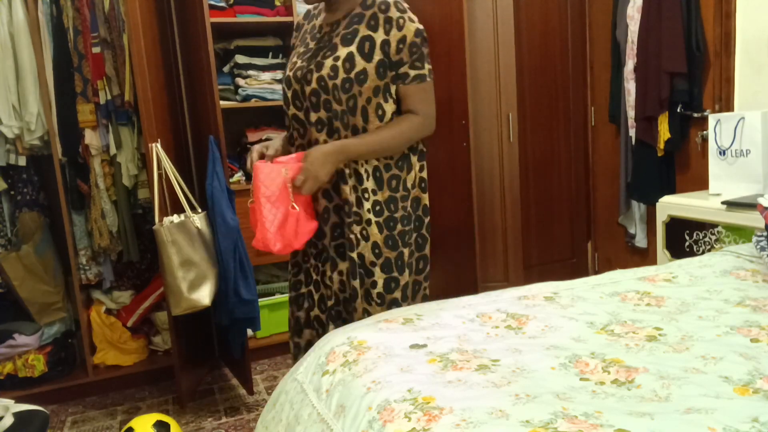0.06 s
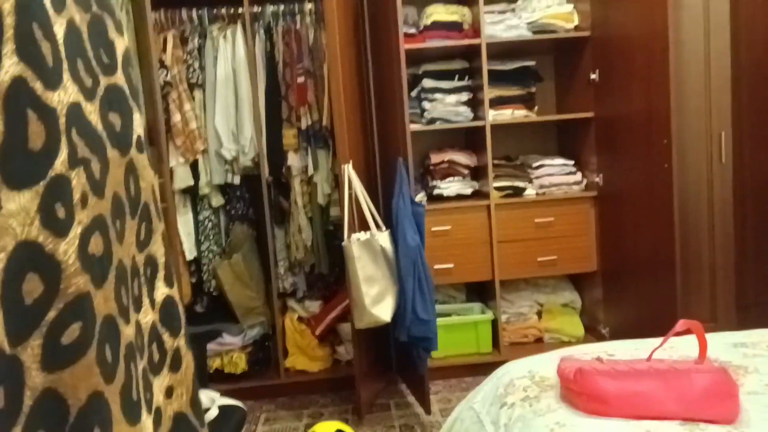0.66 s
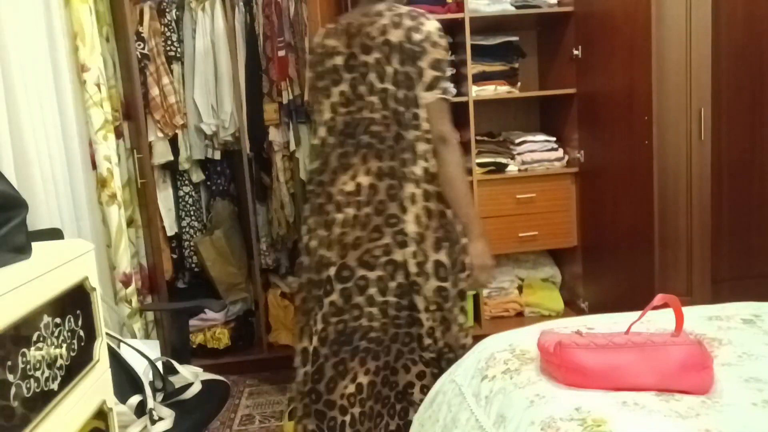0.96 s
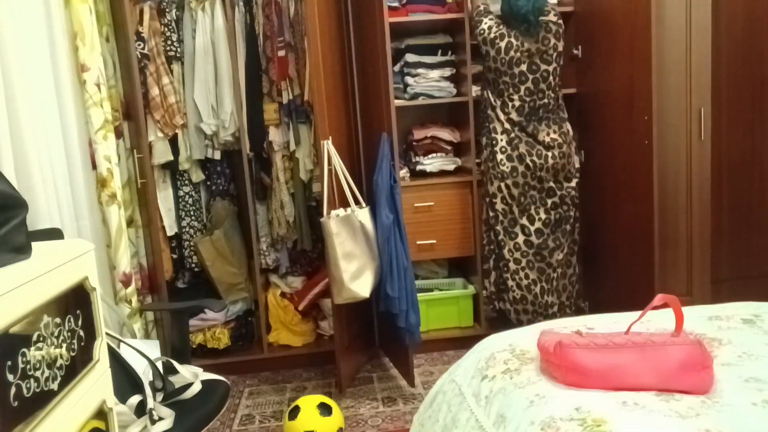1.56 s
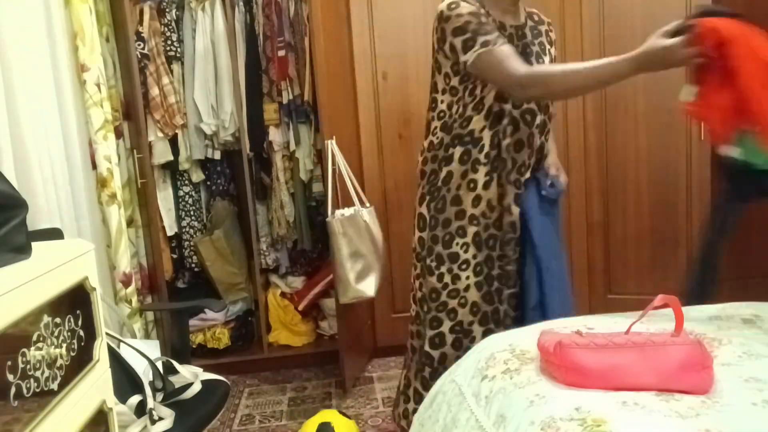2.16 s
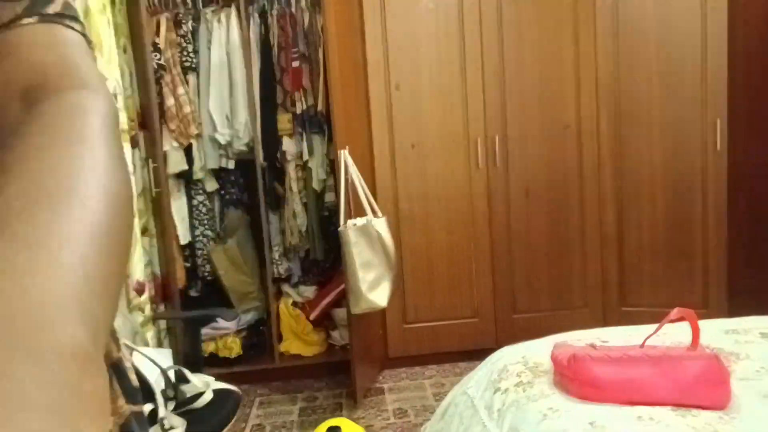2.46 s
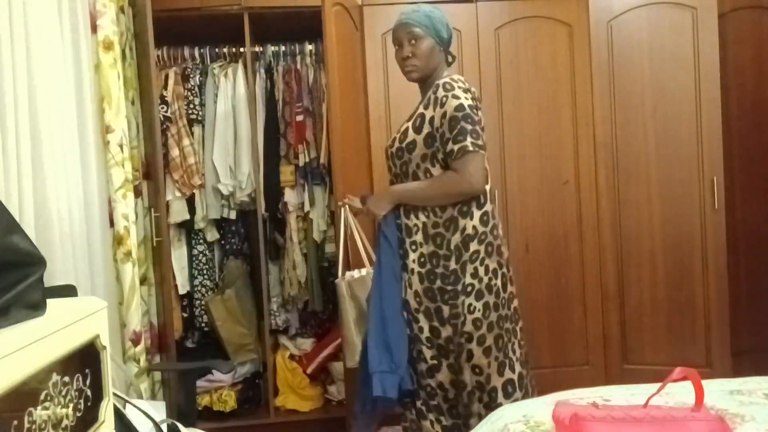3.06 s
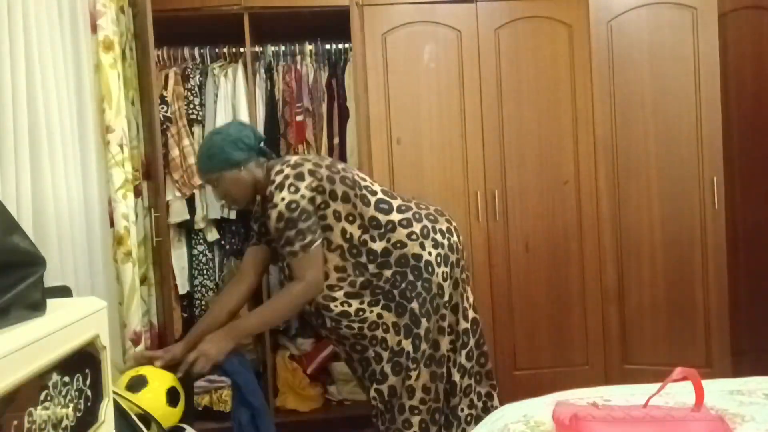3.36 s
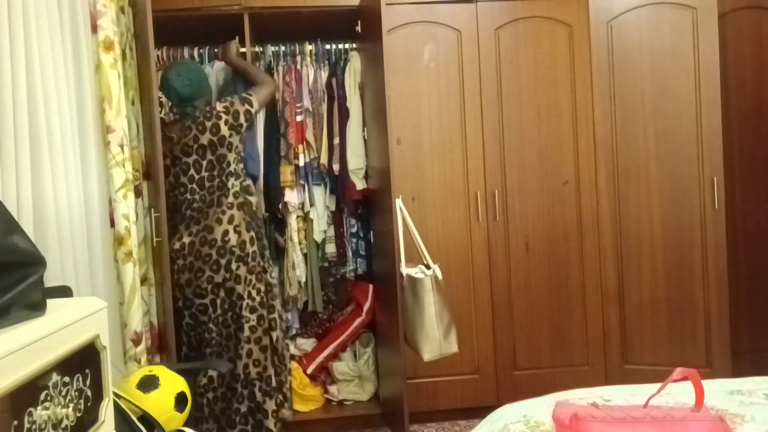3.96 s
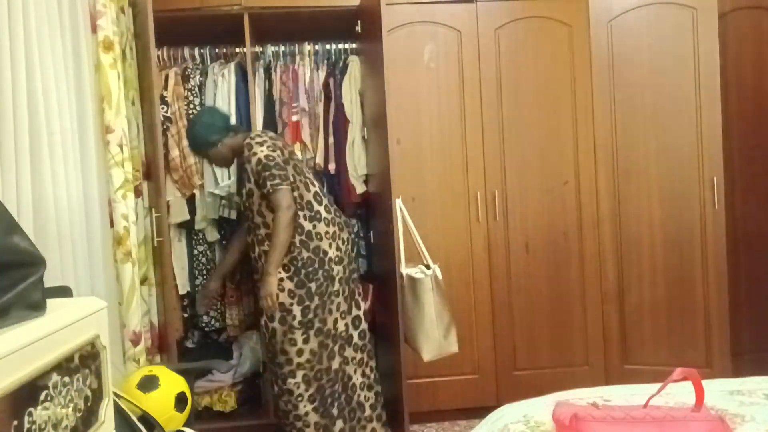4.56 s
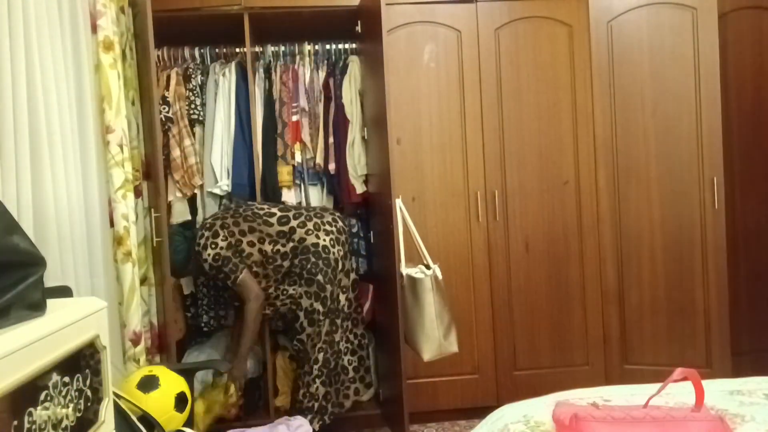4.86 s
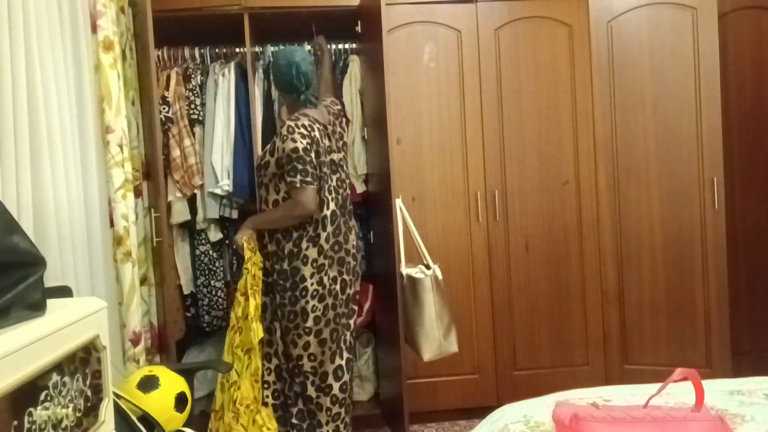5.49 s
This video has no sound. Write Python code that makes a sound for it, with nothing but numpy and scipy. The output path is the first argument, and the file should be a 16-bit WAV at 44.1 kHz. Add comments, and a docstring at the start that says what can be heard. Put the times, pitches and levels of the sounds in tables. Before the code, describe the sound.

Someone tidies clothes in a wooden wardrobe, every sound cut short as if sped up. Fabric swishes and crinkles, a few knocks come early, then soft footsteps thud. A cluster of sharp door knocks follows on the left. Later comes the loudest knock, a brisk rustle and finally ringing hanger clacks. A phone microphone picks it up over the bedroom's faint rumble and hiss.

```python
"""Bedroom, wooden wardrobe: someone tidies clothes, in fast motion, so each sound is cut short.
Cloth swishes and crinkles as fibres catch and slip. Hangers clack on the rail, doors and shelves knock,
feet thud: each a crack and rattle through the wardrobe's resonances, plus the struck part's own modes.
A hook squeaks twice. A phone with two microphone ports hears it over low rumble and faint hiss."""
import sys
import numpy as np
from scipy import signal
from scipy.fft import rfft, irfft
from scipy.io import wavfile
from scipy.ndimage import uniform_filter1d

SR = 44100
rng = np.random.default_rng(int(sys.argv[2]) if len(sys.argv) > 2 else 0)


def store_pcm(level_fs):
    """Save levels as 16-bit WAV."""
    pcm = np.round(np.clip(level_fs, -1, 1) * 32767).astype(np.int16)
    wavfile.write(sys.argv[1], SR, np.atleast_2d(pcm).T)


N = 252693
SIZE, LEAD = 4608, 1764  # samples per event, samples before its peak
MS = (np.arange(SIZE) - LEAD) / SR * 1000
HZ = np.maximum(np.arange(SIZE // 2 + 1) * SR / SIZE, 1)
SCENE_HZ = np.maximum(np.arange(N // 2 + 1) * SR / N, 1)
WOOD_WEIGHT_HZ, LIGHT_WEIGHT_HZ, BRIGHT_HZ = 400, 1010, 3130  # corners: two bass shelves, treble tilt
SHAKEN_RING_HZ, SHAKEN_RING_DB = 2449, -3  # hangers shaken by a knock or thud

# wardrobe and hanger resonances: f/Hz, width/Hz, gain/dB
WARDROBE_MODES = [(141.2, 50, -24.5), (382, 10, -9.5), (577, 56, -8), (785, 37, -6), (937, 9.2, 1),
                  (1102, 22, -36.5), (1103, 14, -29.5), (1625, 240, -4), (2210, 11, -7.5),
                  (2435, 560, -3.5), (2680, 19, -3), (3111, 92, -1.5), (3790, 31, 0.5), (6683, 900, -5)]
# microphone port response, a treble dip and a resonance above it: f/Hz, gain/dB
PORT_RESPONSE = [(7000, 0), (8500, -1), (11500, -3), (13500, -3), (14400, 5), (15200, 12), (15700, 12),
                 (16300, 2)]
# edges of a blow's bands (thump, wood, clack, edge, air): f/Hz
BLOW_EDGES_HZ = [70, 380, 1300, 3800, 8500, 16500]


def amp(db):
    return 10 ** (np.asarray(db) / 20)


def unit(x):
    return x / np.sqrt(np.mean(x ** 2))


def sides(pan_db):
    """Constant-power gains; pan is left minus right."""
    return unit(amp(np.array([[pan_db], [-pan_db]]) / 2))


def curve(points, hz):
    """Gain at hz of a spectrum listed as f/Hz, level/dB."""
    f, db = np.transpose(points)
    return amp(np.interp(np.log(hz), np.log(f), db))


def colour(x, gain):
    """Minimum-phase filter for one event."""
    cepstrum = irfft(np.log(gain + 1e-9))
    cepstrum[1:SIZE // 2] *= 2
    cepstrum[SIZE // 2 + 1:] = 0
    return irfft(rfft(x) * np.exp(rfft(cepstrum)))


def band_centres(edges_hz):
    edges_hz = np.array(edges_hz)
    return np.sqrt(edges_hz[:-1] * edges_hz[1:])


def band_levels(edges_hz, tone_db, weight_db, weight_hz, bright_db):
    """Base tone plus a bass shelf (weight) and a treble tilt (brightness, per half decade)."""
    hz = band_centres(edges_hz)
    bass = 1 / (1 + (hz / weight_hz) ** 4)
    treble = np.log10(np.hypot(1, (hz / BRIGHT_HZ) ** 2))
    return np.array(tone_db) + weight_db * bass + bright_db * treble


def equalise(x, edges_hz, bands_db, duration_samples):
    """Filter smoothly towards the band levels, taken over the duration."""
    for _ in range(2):
        spectrum = np.mean(np.abs(rfft(x)) ** 2, axis=0) * 2 / SIZE
        energy = np.array([spectrum[(HZ >= lo) & (HZ < hi)].sum()
                           for lo, hi in zip(edges_hz, edges_hz[1:])])
        gain_db = bands_db - 10 * np.log10(energy / duration_samples)
        x = colour(x, curve(np.c_[band_centres(edges_hz), gain_db], HZ))
    return x


def swell(rise_ms, decay_ms, onset_spans):
    """Exponential rise and decay, starting onset_spans rise times before the peak."""
    shape = np.exp(np.where(MS < 0, MS / rise_ms, -MS / decay_ms))
    return shape * np.clip(MS / rise_ms + onset_spans, 0, 1)


def snatch(length_ms, fade_ms):
    """Fast motion cuts a sound short."""
    return .5 - .5 * np.tanh((MS - length_ms) / fade_ms)


def add(out, t_s, event):
    start = int(t_s * SR) - LEAD
    lo, hi = max(start, 0), min(start + SIZE, N)
    out[:, lo:hi] += event[:, lo - start:hi - start]


def drift(rate_hz):
    """Smooth random curve, rms 1."""
    hold = int(SR / rate_hz)
    steps = np.repeat(rng.standard_normal(N // hold + 1), hold)
    return unit(uniform_filter1d(uniform_filter1d(steps, hold), hold)[:N])


def port_noise(samples, hz, apart_hz, treble_coherence):
    """Noise field at the two ports: alike in the bass, mostly different above apart_hz."""
    coherence = treble_coherence + (.93 - treble_coherence) / (1 + (hz / apart_hz) ** 2)
    mid, side = rfft(rng.standard_normal((2, samples))) * np.sqrt([1 + coherence, 1 - coherence])
    return irfft(np.array([mid + side, mid - side]), samples) / np.sqrt(2)


def room():
    """Wavering rumble under a steady hiss."""
    # room noise: f/Hz, density/dB
    spectrum = [(25, -9), (70, -1.5), (200, -4), (300, -10.5), (380, -8.5), (520, -17.5), (800, -22.5),
                (1200, -23.5), (2500, -29.5), (4500, -39), (6500, -43.5), (8500, -54.5), (12000, -48.5),
                (16000, -57)]
    noise = port_noise(N, SCENE_HZ, apart_hz=490, treble_coherence=.06)
    air = unit(irfft(rfft(noise) * curve(spectrum, SCENE_HZ) * curve(PORT_RESPONSE, SCENE_HZ), N))
    rumble = irfft(rfft(air) / (1 + (SCENE_HZ / 450) ** 4), N)
    waver_db = 2.1 * drift(rate_hz=35)
    return amp(-60) * (rumble * amp(waver_db) + air - rumble)


def mic_hiss():
    """Microphone self-noise, lifted by the port resonance."""
    return amp(-88) * irfft(rfft(rng.standard_normal((2, N))) * curve(PORT_RESPONSE, SCENE_HZ), N)


def briskness_db(t_s):
    """Friction level: higher when the garments move briskly."""
    # garment friction: t/s, level/dB
    friction = [(0.0, -66), (0.27, -78), (0.99, -80), (1.42, -74), (2.15, -81), (2.55, -72.5), (2.68, -80),
                (3.5, -76.5), (3.8, -79.5), (4.39, -75), (4.58, -73), (4.76, -59), (4.88, -67.5),
                (5.11, -80), (5.3, -85), (5.73, -84)]
    return np.interp(t_s, *np.transpose(friction))


def brush():
    """Faint, fluttering friction of moving garments."""
    # cloth friction: f/Hz, density/dB
    spectrum = [(300, -8.5), (1000, 5), (2500, 13), (4200, 2.5), (6500, 0.5), (8500, -13.5), (12000, -17.5),
                (16000, -20.5)]
    white = rng.standard_normal((2, N))
    rub = irfft(rfft(white) * curve(spectrum, SCENE_HZ) * curve(PORT_RESPONSE, SCENE_HZ), N)
    flutter_db = 3.8 * drift(rate_hz=70)
    return unit(rub) * amp(briskness_db(np.arange(N) / SR) - 1.5 + flutter_db)


def grains(spread_db):
    """Dense run of tiny contacts."""
    sizes = amp(spread_db * np.repeat(rng.standard_normal(SIZE // 16), 16))
    return unit(port_noise(SIZE, HZ, apart_hz=520, treble_coherence=-.05) * sizes)


def wardrobe(x):
    """Nearby panels send each port four echoes; wardrobe and hangers resonate."""
    lags_s = rng.uniform(.3, 3, (2, 4, 1)) / 1000
    echoes = .21 * np.sum(np.exp(-2j * np.pi * HZ * lags_s), axis=1)
    resonances = sum(amp(db) / (1 + 1j * (HZ ** 2 - hz ** 2) / (HZ * width_hz))
                     for hz, width_hz, db in WARDROBE_MODES)
    return irfft(rfft(x) * (1 + echoes) * (1 + resonances))


def mode(hz, db, width_hz):
    """One vibration, db over unit noise within width_hz; rattling blurs its pitch."""
    phase = rng.uniform(0, 2 * np.pi)
    port_shift = np.array([[1], [-1]]) * rng.uniform(-1, 1) * min(hz / 800, np.pi / 2)
    blur = np.cumsum(rng.standard_normal(SIZE)) * np.sqrt(hz * .33 / SR)
    gain = amp(db) * np.sqrt(4 * width_hz / SR)
    return gain * np.sin(2 * np.pi * hz * MS / 1000 + phase + port_shift + blur)


def grain_burst(db, rise_ms, decay_ms, weight_db, bright_db):
    """Short swell of tiny contacts (slipping fibres or a dying rattle); a hanger rings faintly."""
    # band edges (body, rub, hiss, air): f/Hz
    edges_hz = [70, 1300, 3800, 8500, 16500]
    # base tone per band: level/dB
    tone_db = [1, 0.5, -2, -9]
    shape = swell(rise_ms, decay_ms, onset_spans=2.16) * snatch(9.5 + .51 * decay_ms, fade_ms=6.4)
    ring_hz = 3160 * 2 ** (.27 * rng.uniform(-1, 1))
    ring_db = 5 - .3 * (db + 52)  # a firmer hand damps the hanger
    burst = wardrobe(grains(spread_db=0)) + mode(ring_hz, ring_db, width_hz=730)
    burst = colour(burst, curve(PORT_RESPONSE, HZ) / (1 + (110 / HZ) ** 4)) * shape
    bands_db = db + band_levels(edges_hz, tone_db, weight_db, LIGHT_WEIGHT_HZ, bright_db)
    return equalise(burst, edges_hz, bands_db, np.sum(shape ** 2))


def crinkles(per_s=7, spread_db=9.5):
    """Small folds give way at random, louder when the garments move briskly."""
    out = np.zeros((2, N))
    for slot in range(int(per_s * N / SR)):
        t_s = (slot + rng.uniform()) / per_s
        size_db, bright_db = spread_db * rng.uniform(-1, 1, 2)
        db = briskness_db(t_s) + 1 + size_db
        fold = grain_burst(db, rise_ms=5, decay_ms=9, weight_db=-2.5, bright_db=bright_db - 2)
        add(out, t_s, fold * sides(pan_db=-9))
    return out


def swishes_and_rattle():
    """Cloth swishes, and at 4.53 s the dull dying rattle of the loudest knock."""
    # swishes and the one rattle: t/s, level/dB, rise/ms, decay/ms, weight/dB, brightness/dB, pan/dB
    bursts = [(0.124, -52.5, 2.3, 19, -3, 8, -0.5), (0.203, -51, 11.6, 11.7, -2, 10, -0.5),
              (0.277, -71, 7.8, 8, -10, 10, -3), (0.354, -70, 3.9, 7, -15, 14, 1),
              (0.509, -68.5, 3.2, 40, -1, 5, -4), (0.579, -41, 2.1, 2.5, 1, -9, -13),
              (0.69, -54.5, 13, 9.5, 2.5, -3, -3), (0.839, -71.5, 5.4, 13, -12, 22.5, -2),
              (1.03, -63, 3, 9, 0.5, -18, -2), (1.18, -57, 14, 5.4, -28, -16, -2),
              (1.228, -55, 10, 6, -21, -16, -1), (1.26, -71.5, 15, 38, 9, 6, -2),
              (1.37, -63.5, 8, 9.2, 3, -4, -5), (1.438, -63.5, 6.7, 10, 14.5, -10, -5.5),
              (1.477, -55, 5.7, 6.5, 0.5, -13, 1), (1.65, -54, 7, 5, -6, -43, 0),
              (1.742, -65.5, 17, 9, -3, -5, -3), (1.815, -83, 6.7, 5.3, 0, 25.5, -3),
              (1.851, -59.5, 4.8, 21, -5, -38, -1), (1.953, -59, 9.4, 14, -6, -25, -4),
              (2.063, -61.5, 10, 18, -3, -16.5, -2), (2.435, -47, 3.5, 17, -12, -4, -12),
              (2.56, -50.5, 9.2, 11, 1, -7, 3), (2.869, -59, 8.3, 11, -22, 0, -8),
              (3.286, -48.5, 4.8, 4.8, 0, -5, -3), (3.581, -55.5, 19, 12.5, -3, -13, -3),
              (4.035, -55, 14, 20, -18, -6, -1), (4.091, -66, 11, 10, 8.5, -4.5, -1.5),
              (4.361, -49.5, 8.1, 24, 7.5, -5, -0.5), (4.48, -50.5, 8.2, 11, 8, 0, 3),
              (4.526, -36.5, 5, 8.7, 4.5, -23.5, -1.5), (4.598, -59, 14, 11, 9, -11, -4),
              (4.699, -66, 8.3, 17, 6, 21.5, 0), (4.793, -51, 21, 7.8, -19, -23, -2),
              (4.849, -58.5, 14, 10, 11, -4, 0), (4.881, -39.5, 10.9, 6.8, -5, -6, -9),
              (4.903, -40.5, 11.6, 15.3, 3.5, 5, -1.5), (4.941, -32, 8.8, 16.7, -4, 1.5, -1),
              (5.007, -50.5, 7.5, 15, -2.5, -13, -1), (5.039, -59, 15.5, 10, -9, 13, -8.5),
              (5.149, -64.5, 9.5, 29, -1, 2, -0.5), (5.307, -60.5, 5.9, 7.3, -15, -0.5, -2.5),
              (5.53, -59.5, 9.8, 13, -24, 14, -2)]
    out = np.zeros((2, N))
    for t_s, db, rise_ms, decay_ms, weight_db, bright_db, pan_db in bursts:
        add(out, t_s, grain_burst(db, rise_ms, decay_ms, weight_db, bright_db) * sides(pan_db))
    return out


def hanger_ring(hz, db):
    """A hanger's unequal arms split its ring into three close modes."""
    return sum(mode(hz * ratio, db + offset_db, width_hz=1400)
               for ratio, offset_db in [(.86, -1.5), (1, -1.5), (1.14, -4.5)])


def strike(bands_db, rise_ms, decay_ms, pan_db, thump_hz, hollow_hz, hollow_db,
           ring_hz=SHAKEN_RING_HZ, ring_db=SHAKEN_RING_DB):
    """A crack and a dying rattle ring the wardrobe; the struck part and hangers add their modes."""
    shape = swell(rise_ms, decay_ms, onset_spans=24)
    cut = snatch(12 + .85 * decay_ms, fade_ms=2)
    duration_samples = np.sum((shape * cut) ** 2)
    crack_share = .3 * np.exp(-rise_ms / 1.8)  # of the energy; larger for a sudden contact
    contact = grains(spread_db=3) * shape * np.sqrt(1 - crack_share)
    contact[:, LEAD] += np.sqrt(crack_share * duration_samples)
    rattle = wardrobe(contact)
    body = mode(thump_hz, db=7.5, width_hz=89) + mode(hollow_hz, hollow_db, width_hz=370)
    blow = rattle + shape * (body + hanger_ring(ring_hz, ring_db))
    blow = colour(blow, curve(PORT_RESPONSE, HZ) / (1 + (100 / HZ) ** 6)) * cut
    blow = equalise(blow, BLOW_EDGES_HZ, bands_db, duration_samples)
    bass = 1 / (1 + (HZ / 400) ** 4)  # the thump leans further to its side than the clack
    return irfft(rfft(blow) * (bass * sides(1.8 * pan_db) + (1 - bass) * sides(pan_db)))


def clacks():
    """Hangers hit the one rail, each ringing at its own pitch."""
    # hanger hits: t/s, level/dB, rise/ms, decay/ms, weight/dB, brightness/dB, ring/Hz, ring/dB, pan/dB
    hits = [(0.547, -39, 1.1, 4, -1.5, 3.5, 2250, -4, -3.5),
            (2.71, -25, 0.28, 1.16, -38, -15, 2505, 15.5, -20),
            (3.61, -37.5, 3.1, 4.3, -6, -0.5, 1743, 5.5, 0.5),
            (3.9893, -39.5, 1.6, 10, 2.5, 5, 2950, 10, -1), (4.01, -44.5, 6.9, 6.6, -7, 6, 2810, -2, -3),
            (4.385, -37, 3.9, 26, 3, -3.5, 2200, -3, -0.5), (5.5, -28, 2.34, 8, -4.5, 1.5, 2824, 12, -0.5),
            (5.5079, -27, 1, 6.2, -8, -5, 2707, 13.5, 0), (5.562, -39.5, 1.1, 4, 5, -12, 2650, 13, -3.5),
            (5.569, -33, 2.9, 8.2, 3.5, -10.5, 2698, 16.5, -3)]
    # clack tone per band: level/dB
    tone_db = [-11.5, -6.5, 0.5, -4.5, -14]
    out = np.zeros((2, N))
    for t_s, db, rise_ms, decay_ms, weight_db, bright_db, ring_hz, ring_db, pan_db in hits:
        bands_db = db + band_levels(BLOW_EDGES_HZ, tone_db, weight_db, LIGHT_WEIGHT_HZ, bright_db)
        add(out, t_s, strike(bands_db, rise_ms, decay_ms, pan_db, thump_hz=342,
                             hollow_hz=808, hollow_db=-5.5, ring_hz=ring_hz, ring_db=ring_db))
    return out


def knocks():
    """Each door or shelf has its own thump and hollow note, and shakes the hangers."""
    # wood hits: t/s, level/dB, rise/ms, decay/ms, weight/dB, brightness/dB,
    # thump/Hz, hollow/Hz, hollow/dB, pan/dB
    hits = [(0.5857, -32.5, 3.1, 4.7, -1, 0, 395, 501, 22, -0.5),
            (0.6069, -43, 1.1, 9, 8.5, 12, 181, 603, -7, -10),
            (0.6247, -39.5, 2.0, 9.3, 4, 11, 234, 642, 11, -3),
            (0.7088, -37, .4, 6.8, -11, 3.5, 160, 626, 21, -7),
            (2.379, -36.5, 2.6, 4.8, -8, 1, 386, 672, 15, -9.5),
            (2.3902, -38.5, 4.8, 5.3, -5, 1.5, 390, 740, 2, -1),
            (2.453, -35, 2.5, 3.7, 3.5, -1, 153, 565, 2.5, -8),
            (2.466, -33.5, 1.8, 4.4, 4.5, 2.5, 308, 560, 8.5, -9),
            (2.487, -45.5, 10, 6.4, 9.5, 10.5, 95, 1200, 5, -1),
            (2.524, -24, .8, 8.5, 1, 6, 242, 595, 7, -8.5),
            (2.5733, -27, .9, 5.1, -3.5, -3.5, 223, 928, 2.5, -12),
            (2.5923, -25.5, 0.34, 12.1, -1.5, 5, 216, 641, 4, -7.5),
            (3.293, -32.5, 1.9, 9.5, 5.5, -22, 232, 431, 4, -1),
            (3.335, -37.5, 4.1, 17, -3, -1, 234, 501, -1, -2),
            (4.434, -33, 6.5, 9, -8.5, -10, 348, 378, 10, -0.5),
            (4.494, -24, 3.8, 10, -4.5, -10.5, 230, 897, 0.5, 1),
            (4.501, -17.5, 5, 10.6, -2.5, -5.5, 148, 1021, -1, -0.5),
            (4.757, -34, 2.9, 12.7, -0.5, 8.5, 321, 461, 4.5, -1)]
    # knock tone per band: level/dB
    tone_db = [0, 0.5, -1.5, -7.5, -19]
    out = np.zeros((2, N))
    for t_s, db, rise_ms, decay_ms, weight_db, bright_db, thump_hz, hollow_hz, hollow_db, pan_db in hits:
        bands_db = db + band_levels(BLOW_EDGES_HZ, tone_db, weight_db, WOOD_WEIGHT_HZ, bright_db)
        add(out, t_s, strike(bands_db, rise_ms, decay_ms, pan_db, thump_hz, hollow_hz, hollow_db))
    return out


def thuds():
    """Feet and soft bundles land on the floor: mostly thump, little edge."""
    # soft hits: t/s, level/dB, rise/ms, decay/ms, weight/dB, brightness/dB, thump/Hz, pan/dB
    hits = [(1.498, -48, 3.3, 9.8, -10, 11, 127, -2), (1.616, -36.5, 4.6, 7.7, -4.5, -10.5, 174, -1.5),
            (1.914, -42, 1.8, 9.2, -3, -5.5, 136, -1), (2.193, -55, 3, 5, 9, 9, 232, -1),
            (3.157, -45, 5.4, 9.9, 9, 11, 318, -0.5)]
    # thud tone per band: level/dB
    tone_db = [0, 0, -7.5, -20, -34]
    out = np.zeros((2, N))
    for t_s, db, rise_ms, decay_ms, weight_db, bright_db, thump_hz, pan_db in hits:
        bands_db = db + band_levels(BLOW_EDGES_HZ, tone_db, weight_db, WOOD_WEIGHT_HZ, bright_db)
        add(out, t_s, strike(bands_db, rise_ms, decay_ms, pan_db, thump_hz, hollow_hz=501, hollow_db=1.5))
    return out


def squeaks():
    """A hook sticks and slips along the rail at an unsteady pitch."""
    # hook slides: t/s, f/Hz, level/dB, half length/ms
    slides = [(4.697, 9450, -51, 6), (4.94, 3580, -43, 9)]
    out = np.zeros((2, N))
    for t_s, hz, db, half_ms in slides:
        tone = irfft(rfft(rng.standard_normal((2, SIZE))) / (1 + ((HZ - hz) / 240) ** 2))
        add(out, t_s, unit(tone) * amp(db) * np.exp(-(MS / half_ms) ** 2))
    return out


def scene():
    """Tidying over the quiet room."""
    blows = knocks() + clacks() + thuds()
    return blows + swishes_and_rattle() + squeaks() + brush() + room() + mic_hiss() + crinkles()


def record(dry):
    """The phone cuts the top above 15.8 kHz."""
    return signal.sosfilt(signal.ellip(8, .2, 70, 15800, fs=SR, output="sos"), dry)


dry = scene()
out = record(dry)
store_pcm(out)
```